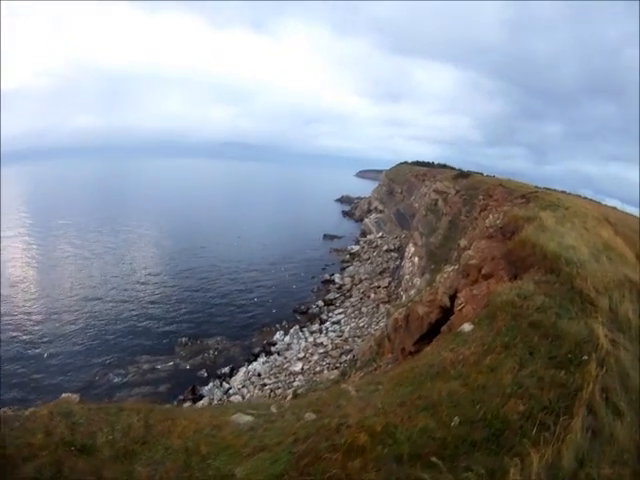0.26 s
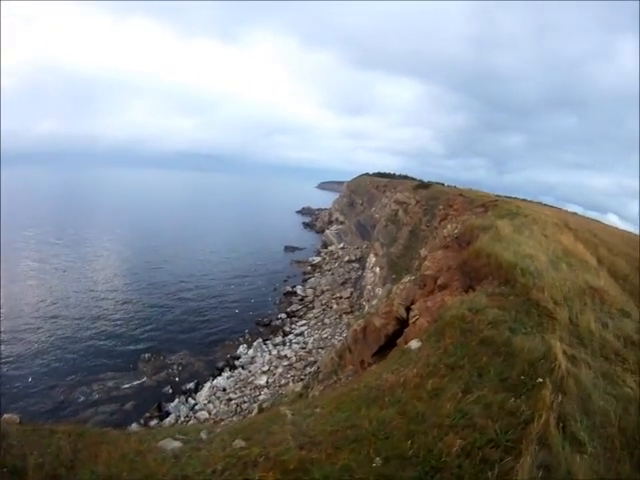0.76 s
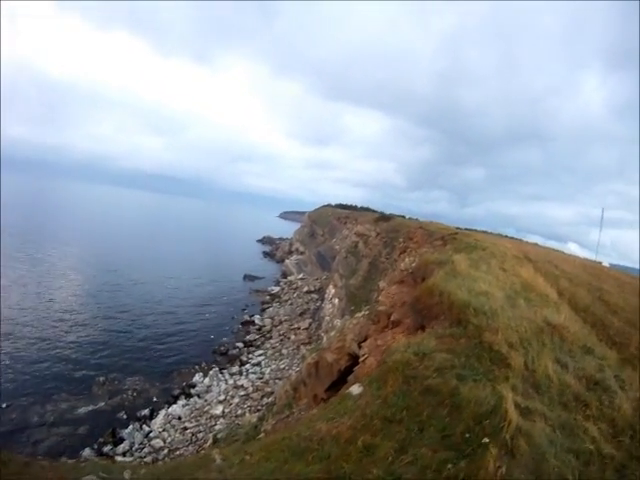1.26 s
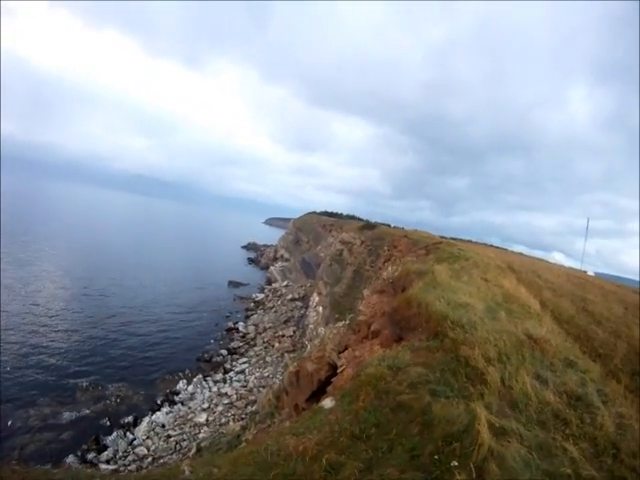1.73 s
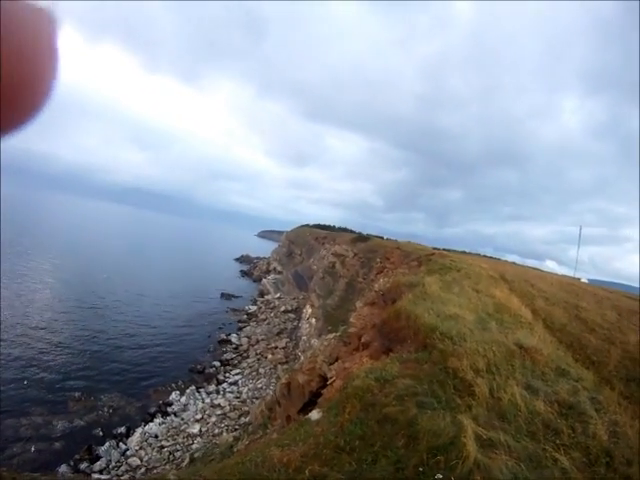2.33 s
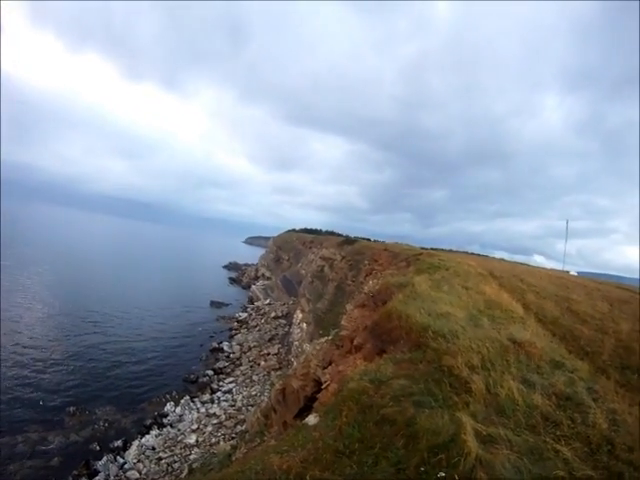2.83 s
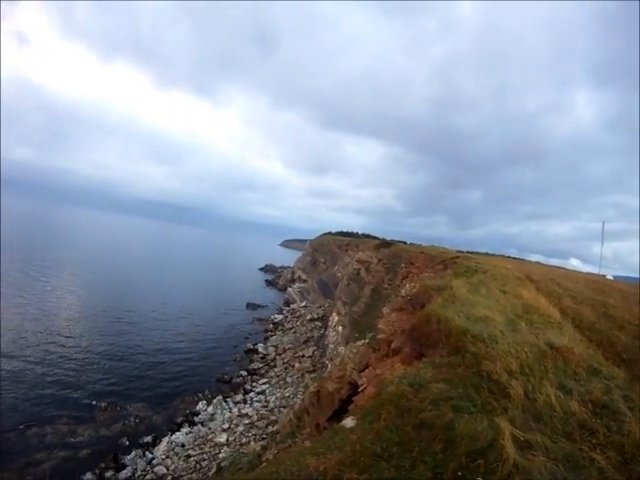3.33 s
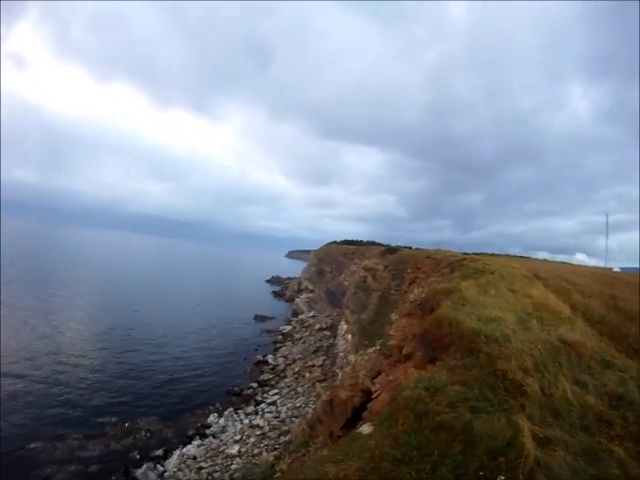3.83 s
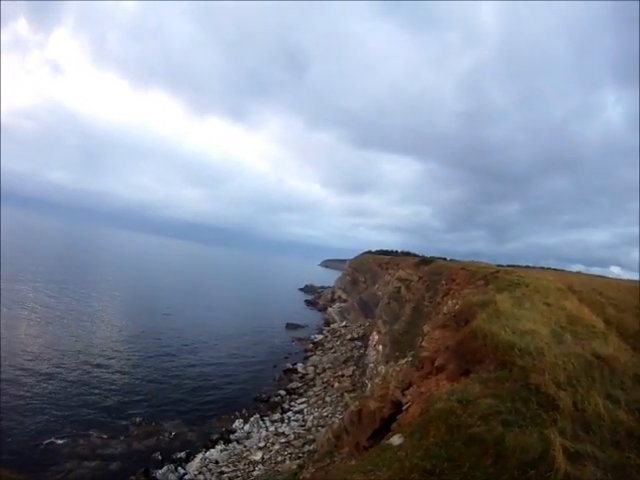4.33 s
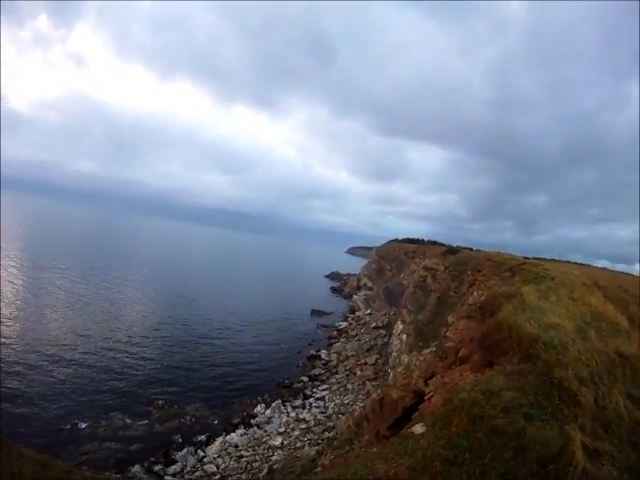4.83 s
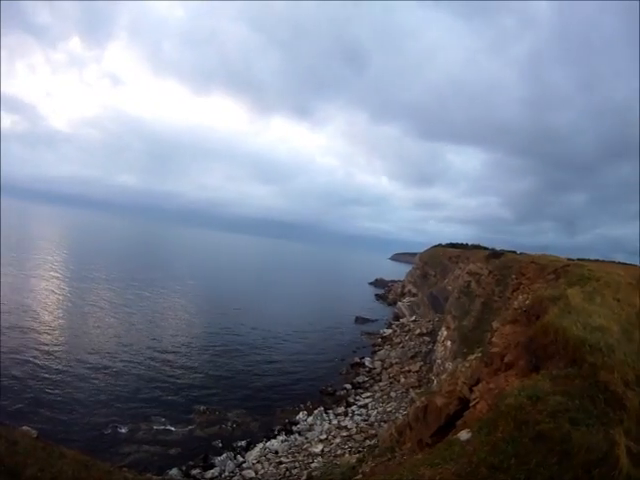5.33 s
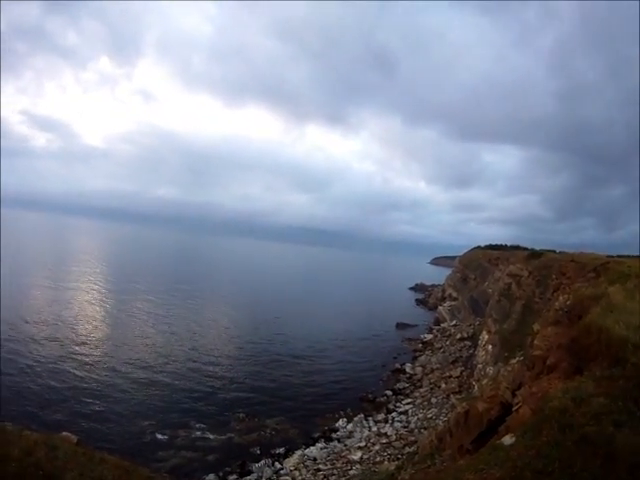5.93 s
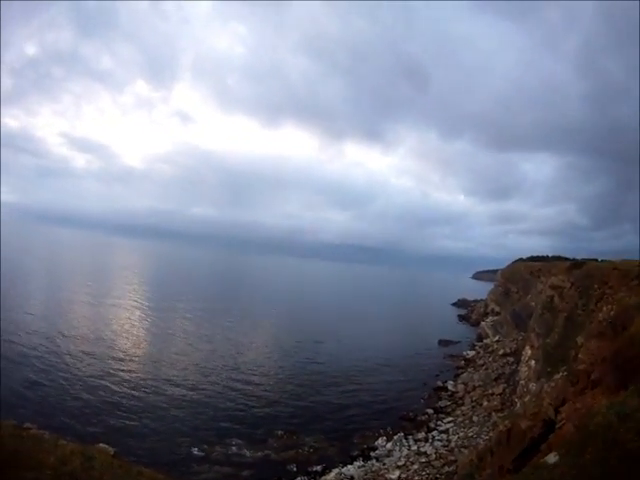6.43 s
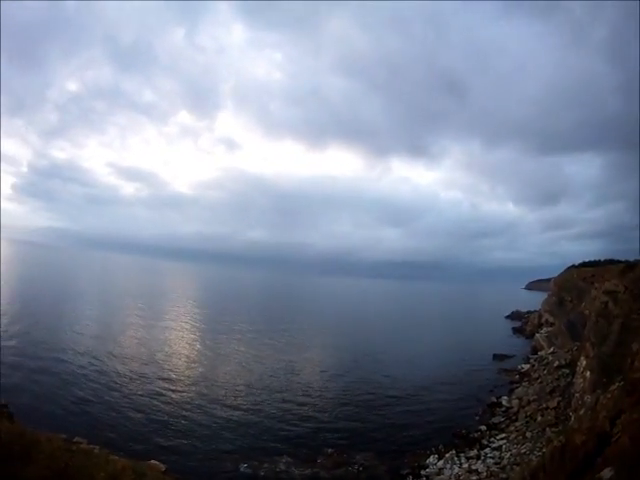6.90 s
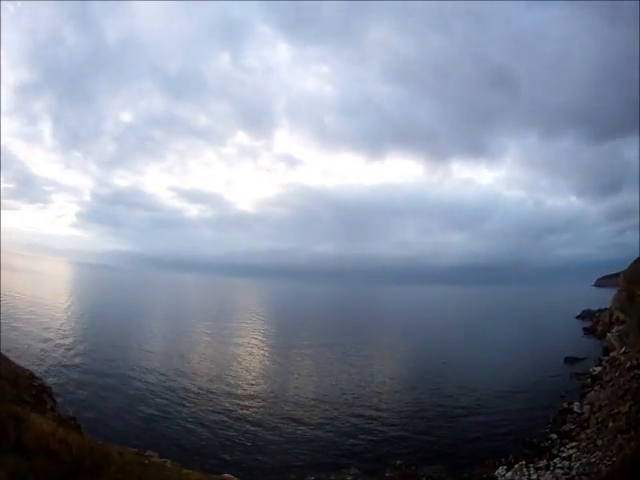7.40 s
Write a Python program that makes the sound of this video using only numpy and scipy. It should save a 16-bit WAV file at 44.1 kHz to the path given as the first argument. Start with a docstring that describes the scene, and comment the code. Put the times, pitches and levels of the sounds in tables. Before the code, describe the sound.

Gulls call continuously beneath an open grassy cliff, captured in mono by a small hand-held camera with a slightly glassy treble. From 0 to 1.5 seconds, low unison wails and a few short yelps sit over a distant chattering chorus, with thin whistles near 0.3 and 0.6. Around 1.63 and 1.7 a finger knocks the camera: a dull thump, then a drier tick. From 1.65 to 3 the nearer birds erupt in quick, bright, overlapping yelps and a hoarse squawk. Rising-falling mews repeat from about 2.5 to 3.7, over a thinning squabble and low murmuring calls. Between 3.7 and 6 come longer wails and high peeps. Wind rumble swells, with heavy buffets near 5.8, 6.3, 6.8 and 7.4. From 6.6 one gull gives four evenly spaced high notes; faint twitters appear near 6.4 and 7.4. Rocks add short scattered echoes, and sea washes faintly throughout.

```python
"""Gulls call from the rocks under a grassy sea cliff: nearer birds wail, mew and yelp over a distant chorus.
Each cry is a stack of gliding harmonics shaped by throat and beak; whistles and twitters are bare sines.
Scattered delays make the rock face echo, and coloured noise makes the sea wash faintly below.
Wind noise and short pressure swings buffet the microphone, harder towards the end; a finger knocks the camera.
A small hand-held camera takes it in mono at a low sample rate, which adds a glassy sheen to the calls."""
import sys
import numpy as np
from scipy import signal
from scipy.fft import rfft, irfft
from scipy.io import wavfile

SR = 44100
rng = np.random.default_rng(int(sys.argv[2]) if len(sys.argv) > 2 else 0)


def inscribe(sig):
    """Save sig as 16-bit PCM at rate SR to the path in sys.argv[1].

    A 1-D sig is mono; a 2-D sig holds one channel per row.
    Samples are clipped to [-1, 1] before scaling.
    """
    pcm = np.round(np.clip(np.atleast_2d(sig).T, -1, 1) * 32767)
    wavfile.write(sys.argv[1], SR, pcm.astype(np.int16))


N = 337806
TIME = np.arange(N) / SR

# Call levels are drive levels, ahead of the throat, beak and growth shaping.
# a gull's throat resonances: [f/Hz, level/dB]
THROAT_SPECTRUM = [(500, -64), (800, -2.5), (1050, 5.5), (2100, 6.5), (3300, -1), (4300, -6), (5500, -16.5)]
# wails, held on one note that slopes a little: [t/s, length/s, f/Hz, level/dB, beak f/Hz, climb/share of f]
WAIL_CALLS = [(-.04, .22, 652, -45.5, 1210, -0.027), (0.101, 0.091, 526, -46.5, 2100, -0.0064),
              (0.422, 0.14, 842, -48.5, 3240, -0.055), (0.757, 0.77, 642, -53.5, 1837, -0.0059),
              (0.868, 0.21, 1258, -51, 2510, 0.038), (1.4, 0.2, 754, -52, 1520, -0.045),
              (1.86, 0.061, 1370, -34, 2480, 0.018), (1.93, 0.05, 834, -40.5, 3320, -0.0031),
              (1.943, 0.035, 952, -50, 1930, 0.024), (2.157, 0.095, 1335, -36, 2440, .055),
              (2.205, 0.091, 810, -52, 1710, 0.1), (2.29, 0.089, 820, -41, 3270, -0.037),
              (2.39, 0.21, 920, -50.5, 1810, -0.051), (4.215, 0.076, 821, -42, 1670, 0.016),
              (5.945, 0.17, 1327, -50.5, 3900, -0.012), (6.19, 0.2, 1290, -48, 2716, 0.043),
              (6.412, 0.076, 938, -40.5, 3649, -0.027)]
# mews, which rise and then fall: [t/s, length/s, f/Hz, level/dB, beak f/Hz]
MEW_CALLS = [(1.579, .14, 651, -41.5, 1940), (1.941, 0.083, 1108, -50, 2250),
             (2.466, 0.14, 1353, -40, 2630), (2.778, 0.16, 1345, -42, 2660), (3.13, 0.17, 1330, -41, 2640),
             (3.53, 0.16, 1335, -42, 2664), (4.243, 0.073, 1336, -43, 2660),
             (4.653, 0.12, 525.6, -40.5, 2080), (4.998, 0.24, 626, -58, 1910),
             (6.36, 0.093, 1380, -41, 2640)]
# moans, which slide down by about a semitone: [t/s, length/s, f/Hz, level/dB, beak f/Hz]
MOAN_CALLS = [(2.328, 0.066, 994, -44, 1890), (2.567, 0.15, 1115, -40.5, 3320),
              (2.581, 0.12, 983, -47.5, 1880), (2.876, .09, 977, -47.5, 1880), (3.183, .09, 997, -46, 1886),
              (3.36, .09, 609.4, -50.5, 1170), (3.76, 0.12, 1118, -50.5, 3250),
              (4.365, 0.047, 640, -42, 2450), (4.64, .1, 567, -43, 1056), (4.922, 0.062, 711, -51, 1370),
              (5.081, 0.062, 542.4, -53, 1037), (5.12, 0.14, 1140, -57, 3307),
              (5.224, 0.054, 662, -54, 1270), (5.671, 0.093, 473, -44, 892), (6.016, 0.073, 533, -47, 960),
              (6.28, 0.105, 1054, -49.5, 2050), (6.388, 0.11, 959, -40.5, 1840)]
# yelps, short and falling all the way: [t/s, length/s, f/Hz, level/dB]
YELP_CALLS = [(0.148, 0.088, 1140, -55), (0.866, 0.065, 1130, -52.5), (1.175, 0.054, 1110, -49),
              (1.346, 0.086, 1250, -50.5), (1.655, 0.057, 1290, -39), (1.905, 0.039, 1150, -44),
              (1.948, 0.065, 1275, -39), (2.116, 0.058, 1150, -39.5), (2.247, 0.053, 1265, -38),
              (2.329, 0.052, 1310, -40), (2.37, 0.055, 1130, -39), (2.46, 0.042, 1180, -41),
              (2.557, 0.078, 1350, -38), (2.89, 0.044, 1300, -46), (2.924, 0.064, 1130, -39),
              (3.188, 0.071, 1150, -42), (3.477, 0.085, 1110, -46), (4.247, 0.046, 1150, -48),
              (4.508, 0.069, 1085, -46), (4.992, 0.029, 1045, -55), (5.75, 0.034, 1045, -49)]
# one gull's long call, a run of evenly spaced high notes: [t/s, level/dB]
LONG_CALL_NOTES = [(6.58, -40), (6.84, -43), (7.11, -43), (7.385, -44.5)]
# hoarse squawks, in which the voice breaks up: [t/s, length/s, level/dB, beak f/Hz]
SQUAWK_CALLS = [(1.881, 0.17, -50.5, 2470), (6.54, .08, -51, 2056), (7.113, 0.2, -51, 1700)]
# drawn-out wails of three birds in near unison: [t/s, length/s, f/Hz, middle bird level/dB, beak f/Hz]
UNISON_WAILS = [(-.05, 0.37, 543, -56, 1074), (0.369, 0.38, 560, -51, 1066), (.7, 0.35, 546.6, -54.5, 1070),
                (1.032, 0.25, 551, -51, 1050), (1.269, 0.24, 531, -50.5, 1028),
                (3.05, 0.61, 701, -50, 2064), (3.72, 0.5, 715.6, -49, 2090), (5.43, 0.38, 602, -59, 1770),
                (7.26, 0.23, 607, -50, 2450)]

# How each kind of call moves: [climb/share of f, closing drop/share of f, lateness of the drop/power,
# beak resonance/dB, beak width/natural log of f, growth over the call/dB]
MOAN_CONTOUR = (-0.04, .03, 2, 18.5, 0.08, 0)
SQUAWK_CONTOUR = (0.5, .1, 1.5, 17, 1.5, -2)
MEW_CONTOUR = (.06, 0.122, 5.94, 15.8, 0.034, 4.3)
NOTE_CONTOUR = (.5, .67, 2, 15.5, 0.28, 18)
LEDGE_CONTOUR = (0.26, .1, 2, 14.5, 0.44, 2.5)
UNISON_CONTOUR = (0.01067, 0.0497, 2.93, 26.5, 0.073, 1.1)
# the same without the climb, which each wail's row gives
WAIL_CONTOUR = (0.0103, 2.75, 17.4, 0.12, 0.69)
# the same without climb and drop, which are worked out for each yelp
YELP_CONTOUR = (2.5, 30, 0.45, 3.5)

# thin high whistles, likely young birds: [t/s, length/s, f/Hz, climb/share of f, level/dB]
WHISTLE_CALLS = [(0.272, 0.29, 4210, -0.038, -54), (0.642, 0.12, 4450, -0.021, -50.5),
                 (3.688, .15, 4420, -.02, -53), (3.97, 0.13, 4466, 0.0054, -48.5),
                 (4.085, 0.24, 4930, 0.026, -55), (4.764, 0.032, 4200, .33, -53),
                 (4.943, 0.27, 5110, 0, -53), (5.352, 0.28, 4210, 0.06, -52.5),
                 (5.386, .045, 4570, 0.11, -52.5), (5.64, 0.078, 4550, 0.15, -56),
                 (5.783, 0.25, 4950, 0.025, -53.5), (6.238, .037, 4440, .3, -56),
                 (6.77, .16, 5150, 0, -59.5), (7.134, 0.031, 4600, 0.14, -44.5)]
# quick twitters of a small bird: [start t/s, end t/s, middle f/Hz, level/dB]
TWITTER_CALLS = [(6.368, 6.605, 5440, -61), (7.412, 7.59, 5400, -59)]
# the distant chorus, ahead of a 3 dB trim: [t/s, level/dB]
CHORUS_SWELL = [(0, -55.5), (.75, -46), (1.5, -45.5), (1.68, -41.5), (1.78, -49.5), (1.95, -43),
                (2.1, -51.5), (2.4, -44.5), (4.5, -41), (5.1, -44), (5.6, -40.5), (7.3, -43), (7.66, -39.5)]
# how shrill the chorus is: [t/s, treble against the middle/dB]
CHORUS_SHRILLNESS = [(0, -2.5), (1.5, -9), (2, 5), (2.7, -1.5), (3.8, -3), (5.2, -10.5), (7.6, -6)]
# colour of the chorus after its way through the air: [f/Hz, level/dB]
FAR_SPECTRUM = [(500, -56), (800, 18), (1050, 3.5), (1300, -1.5), (1600, -0.5), (2100, 3), (2900, -4.5),
                (4300, -2.5), (5500, -8)]
# rumble of wind and handling on the microphone, ahead of WIND_TRIM_DB: [t/s, level/dB]
WIND_RUMBLE = [(0.0, -49.5), (0.23, -43), (0.81, -52), (1.56, -51.5), (1.6, -39.5), (1.73, -53.5),
               (2.64, -47), (2.75, -57.5), (3.09, -44), (3.82, -61), (3.92, -47), (4.5, -44), (5.1, -50),
               (5.4, -47), (5.74, -33), (6.01, -38.5), (6.96, -31.5), (7.04, -40), (7.57, -35.5),
               (7.66, -47.5)]
# the light breeze: [f/Hz, level/dB per Hz]
BREEZE_SPECTRUM = [(15, -10), (40, 0.5), (85, -1), (160, -11), (300, -23.5), (900, -50)]
# the strong gusts: [f/Hz, level/dB per Hz]
GUST_SPECTRUM = [(15, -11), (60, 3), (130, 0), (270, -14), (450, -29), (1000, -70)]
# single buffets on the microphone: [t/s, envelope peak level/dB, f/Hz]
WIND_BUFFETS = [(5.582, -23, 142), (5.765, -17, 112.5), (5.789, -18, 245.5), (5.837, -28, 400),
                (6.271, -19, 151), (6.316, -20.5, 241.6), (6.622, -24, 133), (6.761, -15.5, 99),
                (7.078, -30, 329), (7.354, -16.5, 154), (7.475, -21, 142.4)]
# a finger knocks on the camera body: [t/s, tick level/dB, thump level/dB, thump f/Hz]
FINGER_KNOCKS = [(1.628, -50, -18.5, 374), (1.6949, -27, -29, 524)]
# the sea far below: [f/Hz, level/dB per Hz]
SEA_SPECTRUM = [(100, -12.5), (300, -7), (500, -4.5), (800, -6.5), (1150, 5), (2500, -26), (4000, -8),
                (5800, -23)]

SQUAWK_HZ, SQUAWK_JITTER, SQUAWK_RASP = 715, .04, 0.91  # pitch; wander as a share; flutter depth at 1 kHz
YELP_SAG_PER_S, YELP_BEAK_HZ = 1.71, 3350  # share of the pitch lost each second; beak resonance
NOTE_S, NOTE_HZ, NOTE_BEAK_HZ = .165, 1136, 2776  # one note of the long call
UNISON_DETUNE = .016  # share of the pitch
# a squabble at middle distance
SQUABBLE_AT_S, SQUABBLE_S, SQUABBLE_DB, SQUABBLE_FADE_DB_PER_S = 2.35, 3.5, -48.5, 2.5
SQUABBLE_HZ, SQUABBLE_BEND = 1038, 0.161  # middle pitch; largest slide as a share of it
# soft low calls from the ledges: middle pitch, level of the nearest, beak near the second harmonic, entry time
LEDGE_HZ, LEDGE_DB, LEDGE_BEAK_HZ, LEDGE_JOIN_S = 575, -50, 1004, 2.2
WHISTLE_DROP = 0.034  # closing drop, share of the pitch
WIND_TRIM_DB, SEA_DB = 1.56, -52
CAMERA_HZ, TOP_HZ = 12000, 15250  # camera's sample rate; top of its treble


def undb(db):
    """Decibels to gain."""
    return 10 ** (np.asarray(db) / 20)


def unit(x):
    """Scale to rms 1."""
    return x / np.sqrt(np.mean(x ** 2))


def curve(table, column=1):
    """One column of a table, joined by straight lines in time."""
    return np.interp(TIME, np.array(table)[:, 0], np.array(table)[:, column])


def db_at(hz, points):
    """Read a spectrum on a log-frequency axis."""
    f, db = np.transpose(points)
    return np.interp(np.log(hz + 1), np.log(f), db)


def colour(x, points):
    """Give a sound a spectrum."""
    gain = undb(db_at(np.fft.rfftfreq(N, 1 / SR), points))
    return irfft(rfft(x) * gain, N)


def walk(t, rate):
    """Random wander with a spread near 1, through rate random points a second."""
    steps = (t - t[0]) * rate
    knots = rng.standard_normal(int(steps[-1]) + 2)
    return np.interp(steps, np.arange(len(knots)), knots) * np.sqrt(3 / 2)


def add(out, start, sound):
    """Mix a sound in at a time in seconds."""
    i = int(start * SR)
    a, b = max(i, 0), min(i + len(sound), N)
    if b > a:
        out[a:b] += sound[a - i:b - i]


def near_gulls():
    """The birds that stand out of the flock; every kind of call has its own pitch shape."""
    out = np.zeros(N)
    calls = [((climb, *WAIL_CONTOUR), row) for *row, climb in WAIL_CALLS]
    calls += [(MEW_CONTOUR, row) for row in MEW_CALLS]
    calls += [(MOAN_CONTOUR, row) for row in MOAN_CALLS]
    for start, length, hz, db in YELP_CALLS:
        sag = YELP_SAG_PER_S * length / 2  # half of it steady, half at the close
        calls.append(((-sag, sag, *YELP_CONTOUR), (start, length, hz, db, YELP_BEAK_HZ)))
    for shape, (start, length, hz, db, beak_hz) in calls:
        add(out, start, undb(db) * call(shape, length, hz, beak_hz))
    for start, db in LONG_CALL_NOTES:
        note = call(NOTE_CONTOUR, NOTE_S, NOTE_HZ, NOTE_BEAK_HZ, jitter=0.009)
        add(out, start, undb(db) * note)
    for start, length, db, beak_hz in SQUAWK_CALLS:
        squawk = call(SQUAWK_CONTOUR, length, SQUAWK_HZ, beak_hz, jitter=SQUAWK_JITTER, rasp=SQUAWK_RASP)
        add(out, start, undb(db) * squawk)
    for start, length, hz, db, beak_hz in UNISON_WAILS:
        for side in (-1, 0, 1):
            bird_hz = hz * (1 + side * UNISON_DETUNE)
            wail = call(UNISON_CONTOUR, length, bird_hz, beak_hz, jitter=0.0091)
            add(out, start, undb(db - 4.9 * abs(side)) * wail)
    return out


def call(shape, length, hz, beak_hz, jitter=0.00347, rasp=0.39):
    """A cry of one kind, at its own length and pitch, swelling or fading as it goes."""
    climb, drop, lateness, beak_db, beak_width, growth_db = shape
    pitch = (hz, climb * hz, drop * hz, lateness)
    voiced = cry(length, pitch, beak_hz, beak_db, beak_width, jitter, rasp)
    return voiced * undb(growth_db * np.linspace(-.5, .5, len(voiced)))


def cry(length, pitch, beak_hz, beak_db, beak_width, jitter, rasp):
    """A wavering harmonic voice that ends hoarse; harmonics light up as they slide through the beak resonance."""
    t, hz, swell = glide(length, *pitch)
    hz = hz * (1 + jitter * (walk(t, 128.3) + walk(t, 30.57)))
    phase = 2 * np.pi * np.cumsum(hz) / SR
    voice = np.zeros(len(t))
    # harmonics stop at half the camera's sample rate
    for k in range(1, int(CAMERA_HZ / 2 / hz.max()) + 1):
        partial_hz = k * hz
        resonance = np.exp(-(np.log(partial_hz / beak_hz) / beak_width) ** 2)
        db = db_at(partial_hz, THROAT_SPECTRUM) + beak_db * (resonance - 1)
        # moving air makes each harmonic fade in and out on its own
        voice += undb(db + 2.6 * walk(t, 35)) * np.sin(k * phase)
    # high yelps are forced harder than low wails, so they rasp more
    hoarse = 1 + rasp * (hz / 1000) * (t / t[-1]) * walk(t, 800)
    return np.sqrt(2) * voice * hoarse * swell


def glide(length, start_hz, climb_hz, drop_hz, lateness=3):
    """Time, pitch and loudness of a call: a steady climb, and a drop that quickens as the air runs out."""
    t = np.arange(int(max(length, .03) * SR)) / SR
    u = t / t[-1]
    hz = start_hz + climb_hz * u - drop_hz * u ** lateness
    swell = np.abs(np.sin(np.pi * u)) ** .5
    return t, hz, swell


def squabble(count=58):
    """Several birds yelp over each other, each sliding down by its own amount, loudest at first."""
    out = np.zeros(N)
    for i, (when, span, voice, beak, bend) in enumerate(rng.random((count, 5))):
        since = SQUABBLE_S * (i + when) / count
        shape = (-SQUABBLE_BEND * bend / 2, SQUABBLE_BEND / 2, *YELP_CONTOUR)
        hz = SQUABBLE_HZ * (1 + .55 * (voice - .5))
        yelp = call(shape, 0.04 + 0.05 * span, hz, 2100 + 1600 * beak)
        db = SQUABBLE_DB - SQUABBLE_FADE_DB_PER_S * since
        add(out, SQUABBLE_AT_S + since, undb(db) * yelp)
    return out


def ledge_gulls(count=52):
    """A steady weave of low calls, each sliding up through the others; the beak favours the second harmonic."""
    out = np.zeros(N)
    for i, (when, span, voice, distance) in enumerate(rng.random((count, 4))):
        hz = LEDGE_HZ * (1 + .28 * (voice - .5))
        voiced = call(LEDGE_CONTOUR, 0.055 + 0.0897 * span, hz, LEDGE_BEAK_HZ)
        start = LEDGE_JOIN_S + (i + when) / count * (N / SR - LEDGE_JOIN_S)
        add(out, start, undb(LEDGE_DB - 4.1 * distance) * voiced)
    return out


def whistlers():
    """A few clear peeps, and twitters that zigzag in pitch."""
    out = np.zeros(N)
    for start, length, hz, climb, db in WHISTLE_CALLS:
        add(out, start, undb(db) * peep(length, hz, climb))
    for start, end, middle_hz, db in TWITTER_CALLS:
        t, hz, swell = glide(end - start, middle_hz, 0, 0)
        phase = 2 * np.pi * np.cumsum(hz * (1 + 0.058 * walk(t, 70))) / SR
        add(out, start, undb(db + 3.8 * walk(t, 49)) * swell * np.sin(phase))
    return out


def peep(length, pitch_hz, climb):
    """One nearly pure, slightly trembling whistle."""
    t, hz, swell = glide(length, pitch_hz, climb * pitch_hz, WHISTLE_DROP * pitch_hz)
    phase = 2 * np.pi * np.cumsum(hz * (1 + 0.0057 * walk(t, 121.0))) / SR
    return undb(2 * walk(t, 26.3)) * swell * np.sin(phase)


def cliff(x, t60, count=70):
    """Scattered echoes from ledges and boulders, dying away by 60 dB in t60 seconds."""
    delay = .008 + t60 * rng.random(count)
    response = np.zeros(N)
    response[(delay * SR).astype(int)] = rng.standard_normal(count) * undb(-60 * delay / t60)
    return signal.fftconvolve(x, response / np.linalg.norm(response))[:N]


def chorus():
    """The far flock swells and sinks; its shrillness rises and falls separately."""
    birds = far_gulls()
    birds = birds + .35 * cliff(birds, t60=.6)
    lowpass = signal.butter(4, 2450, fs=SR, output="sos")
    middle = signal.sosfiltfilt(lowpass, birds)
    shrill = undb(curve(CHORUS_SHRILLNESS)) * unit(birds - middle)
    return undb(curve(CHORUS_SWELL) - 3.0) * (unit(middle) + shrill)


def far_gulls(count=290):
    """Calls from further off: low wails mixed with shorter high yelps that drop more at the end."""
    out = np.zeros(N)
    for i, (when, kind, voice, span, fall, beak, distance) in enumerate(rng.random((count, 7))):
        yelp = kind < .5
        hz = 950 + 400 * voice if yelp else 500 + 240 * voice
        length = (.04 if yelp else .065) * (1 + 1.3 * span)
        pitch = hz * np.array([1, .2 * (.45 - fall), .13 if yelp else .06])  # start, climb, drop
        beak_hz = 1000 * 3.8 ** beak
        voiced = cry(length, pitch, beak_hz, beak_db=12, beak_width=.16, jitter=.004, rasp=.2)
        add(out, (i + when) / count * N / SR - .1, undb(-5 * distance) * voiced)
    return colour(out, FAR_SPECTRUM)


def wind():
    """Eddies rumble on the microphone in lumps; stronger wind reaches higher in pitch."""
    db = curve(WIND_RUMBLE)
    strength = np.clip((db + 47.0) / 9, 0, 1)
    breeze = unit(colour(rng.standard_normal(N), BREEZE_SPECTRUM))
    gust = unit(colour(rng.standard_normal(N), GUST_SPECTRUM))
    lumps = unit(undb(3.7 * walk(TIME, 50) + 2 * walk(TIME, 20)))
    blend = np.sqrt(1 - strength) * breeze + np.sqrt(strength) * gust
    return undb(db + WIND_TRIM_DB) * lumps * blend


def buffets():
    """Each eddy that hits the microphone port is a swing of pressure about one cycle long."""
    out = np.zeros(N)
    t = np.arange(-SR // 40, SR // 40) / SR
    for time, db, hz in WIND_BUFFETS:
        swing = np.sin(2 * np.pi * (hz * t + rng.random())) * np.exp(-(hz * t / 0.32) ** 2)
        add(out, time + t[0], undb(db) * swing)
    return out


def ticks():
    """A finger knock: a short thump that sinks in pitch, with a dry tick and a faint scuff of skin."""
    out = np.zeros(N)
    t = np.arange(SR // 10) / SR
    for time, tick_db, thump_db, hz in FINGER_KNOCKS:
        thump = np.sin(15 * (1 - np.exp(-hz * t / 2.3))) * np.exp(-(hz * t / 1.53) ** 2)
        fade = np.exp(-t / 0.0017) + 0.34 * np.exp(-t / 0.031)  # tick, then scuff
        tick = fade * rng.standard_normal(len(t))
        add(out, time, undb(thump_db) * thump + undb(tick_db) * tick)
    return signal.sosfilt(signal.butter(2, 4500, fs=SR, output="sos"), out)


def sea():
    """A soft wash of coloured noise that rises and sinks."""
    wash = unit(colour(rng.standard_normal(N), SEA_SPECTRUM))
    return wash * undb(SEA_DB + walk(TIME, 1.64))


def scene():
    """Everything reaches one microphone, heard alike on both channels."""
    near = near_gulls() + squabble() + ledge_gulls() + whistlers()
    echo = undb(-14.5) * cliff(near, t60=.5)
    mono = near + echo + chorus() + wind() + buffets() + ticks() + sea()
    return np.array([mono, mono])


def record(dry):
    """The camera samples slowly and holds each value, which mirrors the calls into the treble."""
    # a gentle filter ahead of the slow sampling
    slow = signal.resample_poly(dry, CAMERA_HZ, SR, axis=1, window=("kaiser", 5))
    steps = np.repeat(slow, 4, axis=1)
    held = signal.resample_poly(steps, SR, 4 * CAMERA_HZ, axis=1)[:, :N]
    lowpass = signal.ellip(10, .2, 80, TOP_HZ, fs=SR, output="sos")
    return signal.sosfilt(lowpass, held)


dry = scene()
out = record(dry)
inscribe(out)
```